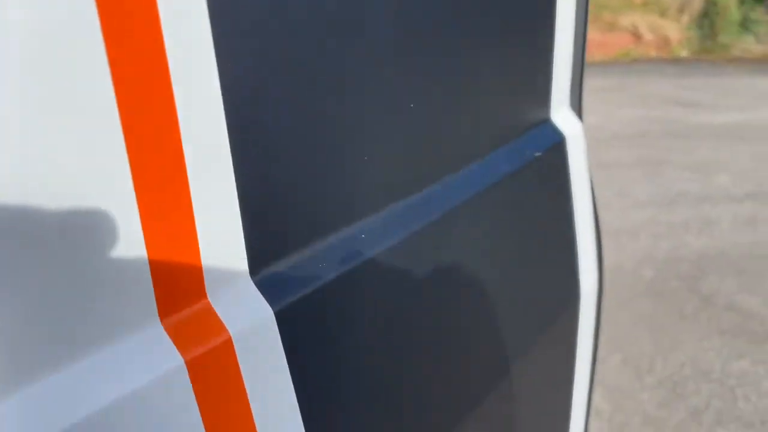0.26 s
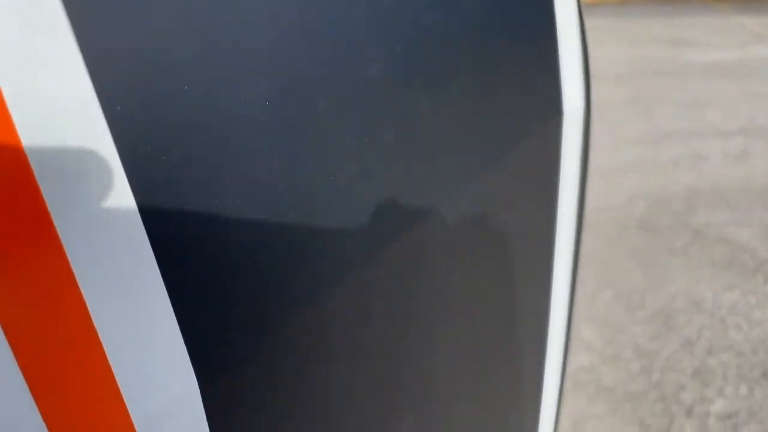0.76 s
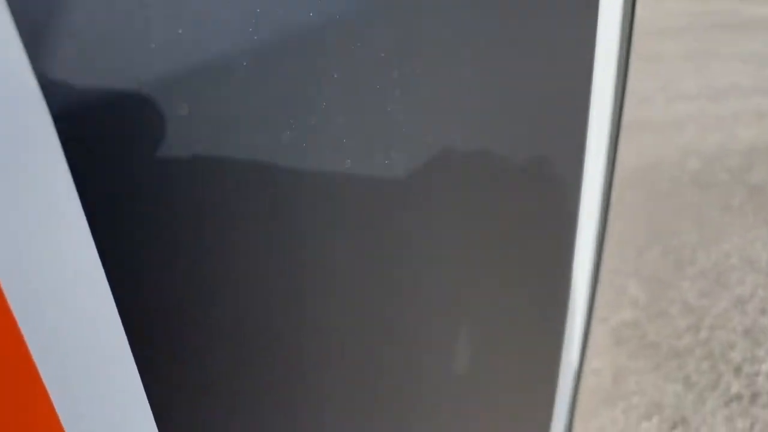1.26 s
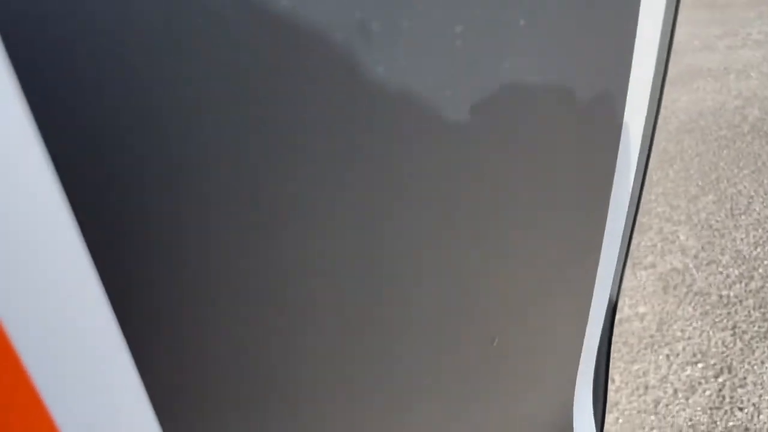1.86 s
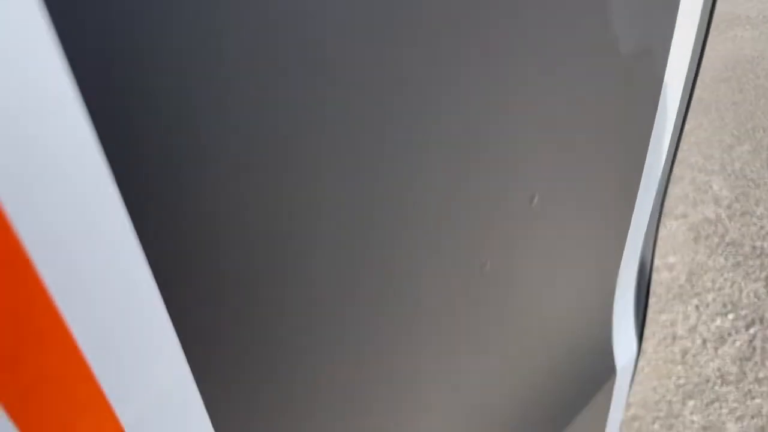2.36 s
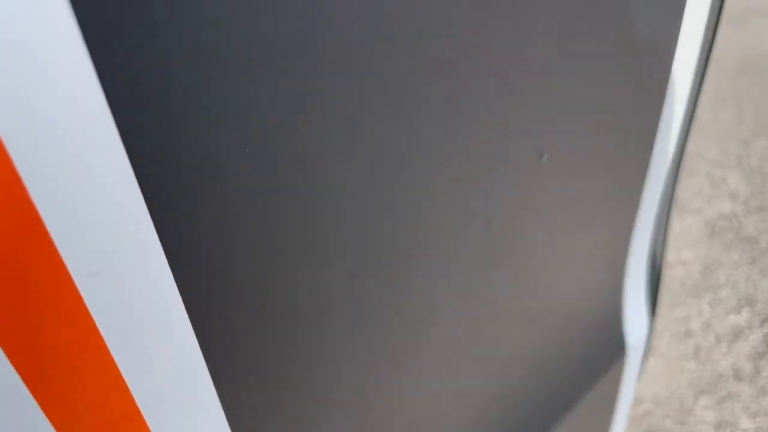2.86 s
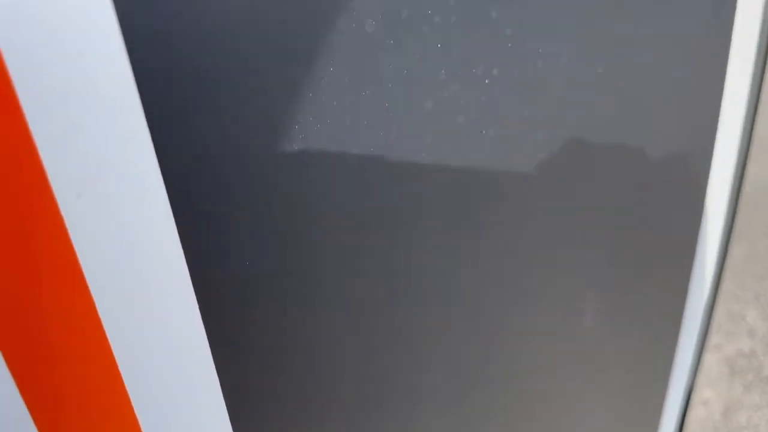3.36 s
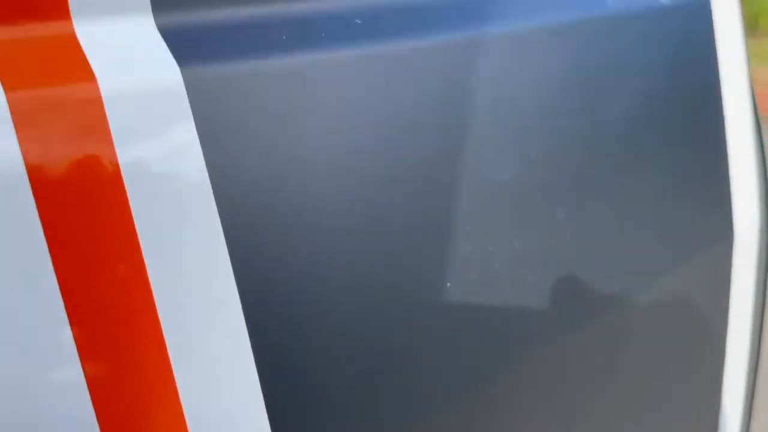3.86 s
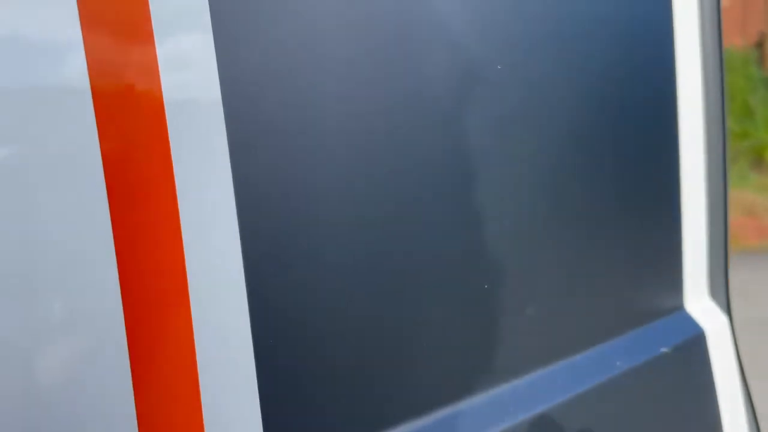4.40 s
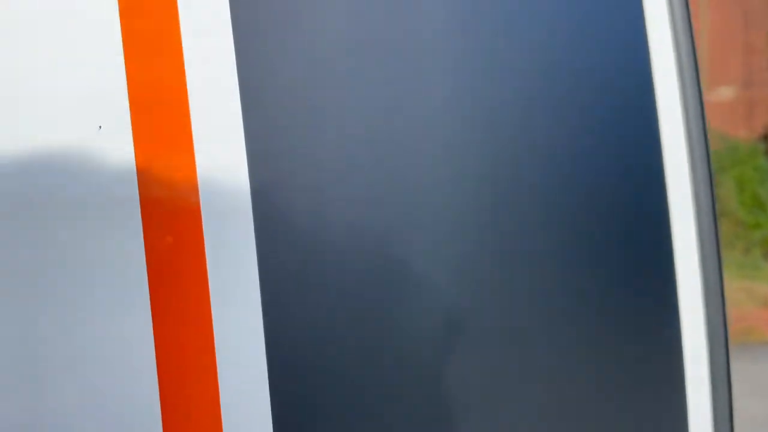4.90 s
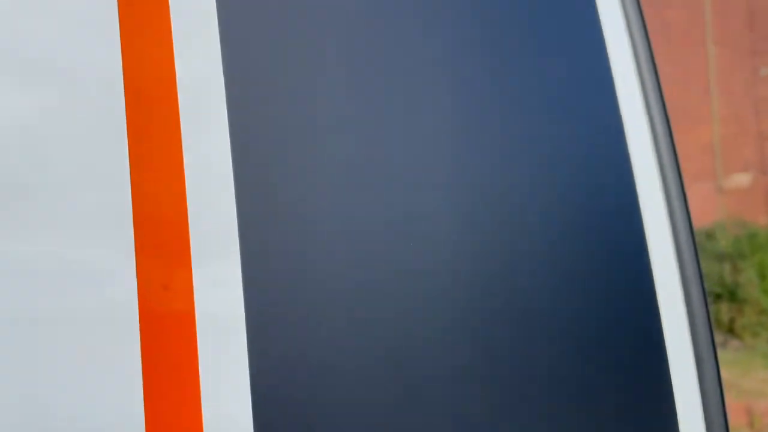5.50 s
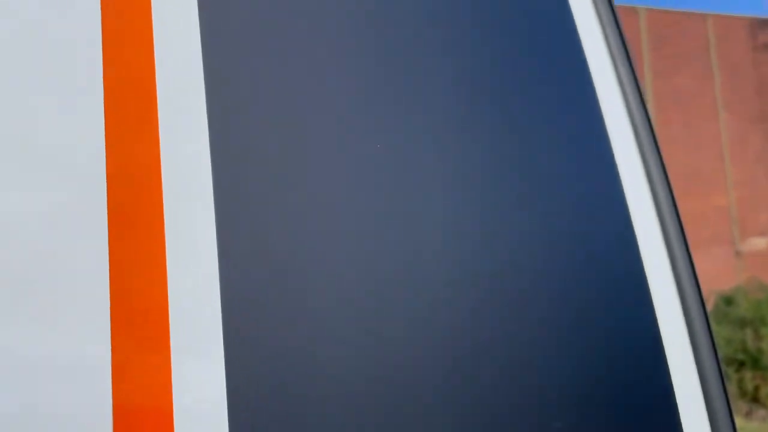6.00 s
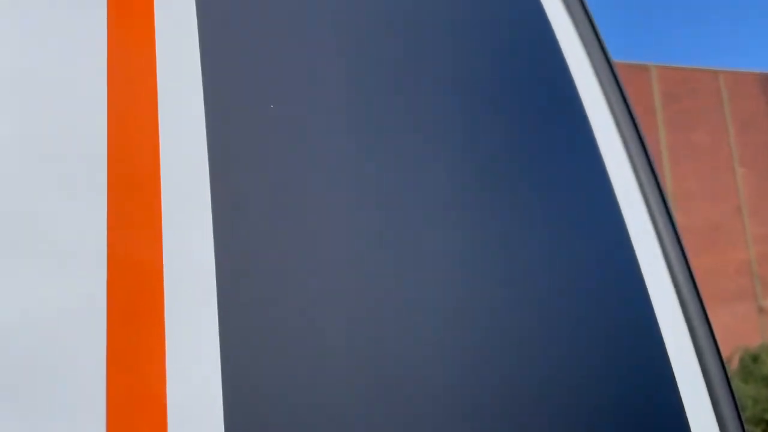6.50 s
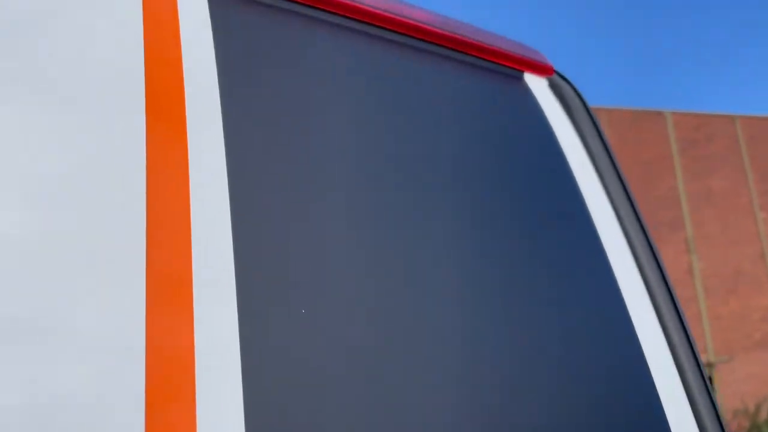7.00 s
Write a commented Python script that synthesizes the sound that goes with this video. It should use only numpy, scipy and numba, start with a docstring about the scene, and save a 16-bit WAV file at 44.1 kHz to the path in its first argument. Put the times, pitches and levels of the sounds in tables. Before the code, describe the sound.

Stereo handheld phone sound beside a van on an open tarmac lot, with a steady soft bed of wind rumble and far traffic. At 0 s a struck metal part is already ringing, bright and rattly, fading within about half a second. From 0.15 to 0.5 s a latch makes a dense flurry of small, hard clicks. Low, short thuds of steps and handling continue irregularly, firmer at 0.5 and 1.4 s. At 2.6 s a heavy slam booms through large panels, with quick weaker rebounds and a dull tail. Faint, blurred birds chirp intermittently until 4.9 s. Tiny dry ticks appear at 3.6, 4.5, 5.6, 6.4 and 6.9 s. A faint vehicle passes around 4.7 s; a stronger tyre roar swells around 6.3 s. From 6.9 to 7.2 s strong, deep knocks cluster as the rumble rises, then everything stops.

```python
"""An open tarmac lot beside a van, heard through a phone held in the hand, with a left and a right channel.
At the start a struck metal part is already ringing out, as decaying tones with rattling noise, and a latch clicks
as short high rings. Sinking low tones make steps and knocks throughout; at 2.6 s ringing panels make a heavy slam.
Tiny ticks follow from 3.6 s, vehicles of shaped noise swell past from 4.7 s, and strong knocks come near the end.
Noise makes the rumble of wind and far traffic all along; birds, as blurred whistles, chirp until 4.9 s."""
import sys
import numpy as np
from scipy import signal
from scipy.fft import rfft, irfft, next_fast_len
from scipy.io import wavfile
from scipy.ndimage import uniform_filter1d
from numba import njit

SR = 44100
rng = np.random.default_rng(int(sys.argv[2]) if len(sys.argv) > 2 else 0)


def int16_out(signal):
    """Quantize to a 16-bit WAV file."""
    q = np.round(np.clip(np.atleast_2d(signal).T, -1, 1) * 32767)
    wavfile.write(sys.argv[1], SR, q.astype(np.int16))


N = 319725
MARGIN = 4096  # samples made beyond both ends, so that filters have settled
LONG = next_fast_len(N + 2 * MARGIN)
LEFT_RIGHT = np.array([[1], [-1]])  # added to the left channel, taken from the right


def undb(db):
    """Turn decibels into a factor."""
    return 10 ** (np.asarray(db, float) / 20)


def curve(table):
    """Draw straight lines through (time, value) points."""
    table = np.array(table)
    return np.interp(np.arange(N) / SR, table[:, 0], table[:, 1])


def unit(x):
    """Scale a sound to an average (RMS) level of 1."""
    return x / np.sqrt(np.mean(x ** 2))


def by_pitch(hz, values):
    """Read a value for every frequency of a long sound, between points spaced by pitch."""
    f = np.maximum(np.arange(LONG // 2 + 1) * SR / LONG, 1)
    return np.interp(np.log(f), np.log(hz), values)


def colour(x, table):
    """Shape a sound by (Hz, dB) points."""
    hz, db = np.transpose(table)
    return irfft(rfft(x) * undb(by_pitch(hz, db)), LONG)


@njit
def svf(x, hz, width):
    """State-variable band-pass filter, gain 1 at the centre."""
    y, b, l = np.empty(len(x)), 0., 0.
    g, k = np.tan(np.pi * hz / SR), width / hz
    for i in range(len(x)):
        v = (b + g * (x[i] - l)) / (1 + g * (g + k))
        b, l, y[i] = 2 * v - b, l + 2 * g * v, k * v
    return y


def narrow(x, hz, width):
    """Keep a band of a sound, filtered twice for steeper sides."""
    hz, width = float(hz), float(width)
    return svf(svf(x, hz, width), hz, width)


def walk(rate):
    """Wander between random levels, `rate` new ones per second, smoothed twice; spread 1."""
    k = int(SR / rate)
    steps = np.repeat(rng.standard_normal(LONG // k + 1), k)
    return unit(uniform_filter1d(uniform_filter1d(steps, k), k)[:LONG])


def restless(table, shared_db, own_db):
    """Noise of a given colour whose octaves swell together and flicker alone, at RMS level 1."""
    shared = shared_db * walk(6.8)
    total = np.zeros(LONG)
    for hz in 30 * 2. ** np.arange(10):
        band = svf(rng.standard_normal(LONG), hz, 0.89 * hz)
        total += band * undb(shared + own_db * walk(15))
    return unit(colour(total, table))


# How alike the two channels are, from -1 (opposed) to 1 (same); values beyond are clipped.
# Columns: pitch_hz, far_sound (-1 to 1), vehicle (-1 to 1), metal (-1 to 1)
CHANNEL_LIKENESS = [(59, 0.63, 0.85, .7), (239, 0.92, 0.72, .7), (560, -0.17, -0.36, 0.85),
                    (1070, -0.61, 1, 0.87), (1430, -0.28, 0.45, 0.45), (2390, 0.76, 0.78, 0.72),
                    (3920, 0.19, 1, -0.17), (4930, 0.7, 1, -0.082), (5820, 0.13, 0.2, -0.78),
                    (7220, -1.015, -.9, -0.86), (8720, -0.54, -0.42, -0.028), (11700, 1, -0.44, 0.16)]
# How much more the left channel hears than the right. Columns: pitch_hz, difference_db
LEFT_OVER_RIGHT = [(60, 0), (125, 0.5), (250, 2), (490, 4.5), (750, 1), (2000, 0), (4000, 3), (8000, 0)]


def ports(x, other, column, turn=0.):
    """The right channel shares part of the left one's sound, by frequency; the rest is its own."""
    table = np.array(CHANNEL_LIKENESS)
    alike = np.clip(by_pitch(table[:, 0], table[:, column]), -1, 1)
    f = np.maximum(np.arange(LONG // 2 + 1) * SR / LONG, 1)
    turned = np.exp(1j * turn * (alike > 0) * (f > 400))
    shared = alike * rfft(x) * turned
    own = np.sqrt(1 - alike ** 2) * rfft(other)  # keeps the total power
    right = irfft(shared + own, LONG)
    half = np.array(LEFT_OVER_RIGHT) * [1, .5]
    return np.array([colour(x, half), colour(right, half * [1, -1])])[:, MARGIN:MARGIN + N]


def add(out, s, sound):
    """Mix a sound in, starting at s seconds."""
    i = int(s * SR)
    out[..., i:i + sound.shape[-1]] += sound[..., :N - i]


def fade(t, t60):
    """Die away by 60 dB in t60 seconds."""
    return np.exp(-np.log(1000) * t / t60)


def rise(t, build_s):
    """Build up smoothly: 63 percent after build_s seconds."""
    return 1 - np.exp(-t / build_s)


def ring(modes, t, spread, tilt_db=0.):
    """Strike modes, each a little detuned and uneven; a positive tilt (dB per octave) favours the high ones."""
    chance = rng.standard_normal((len(modes), 2))
    middle_hz = modes[len(modes) // 2][0]
    total = 0.
    for (hz, db, t60), (uneven, detune) in zip(modes, chance):
        level = undb(db + 1.2 * uneven + tilt_db * np.log2(hz / middle_hz))
        total = total + level * fade(t, t60) * np.sin(2 * np.pi * hz * (1 + spread * detune) * t)
    return total


def echo(sound, tail):
    """Blend a sound with a random tail, each channel with its own."""
    return signal.fftconvolve(sound, tail / np.linalg.norm(tail[0]), axes=1)[:, :N]


# Steps and knocks; the base pitch is scaled by the glide below.
# Columns: start_s, level_db (before the push shapes it), base_pitch_hz, t60_s (time to fade 60 dB)
STEPS_AND_KNOCKS = [(0.228, -24.5, 63.6, 0.14), (0.258, -29, 73.3, 0.37), (0.44, -29, 101, .082),
                    (0.521, -12.5, 72, 0.047), (0.581, -22.5, 84, .12), (0.682, -26, 63.5, 0.087),
                    (0.717, -26, 54, 0.22), (0.886, -23, 65, 0.17), (1.049, -31, 64, 0.29),
                    (1.178, -25.5, 57, 0.12), (1.435, -14, 84.3, 0.078), (2.033, -30, 54, 0.17),
                    (2.334, -28.5, 91.5, 0.15), (2.726, -40, 55, 0.087), (2.759, -25, 51.6, 0.15),
                    (2.839, -26, 73, 0.06), (2.89, -31, 78.5, 0.082), (3.082, -29.5, 72, 0.33),
                    (3.121, -27, 66.5, 0.18), (4, -28.5, 62, 0.16), (4.405, -29, 54, 0.22),
                    (4.745, -24.5, 85, 0.13), (5.231, -29.5, 64, 0.11), (5.693, -27.5, 58, 0.17),
                    (5.939, -29, 68, 0.15), (6.418, -29.5, 66.3, 0.31), (6.78, -28, 71.3, 0.13),
                    (6.89, -12, 70.6, 0.11), (7.006, -16.5, 133, 0.078), (7.033, -12, 82, 0.063),
                    (7.067, -17.5, 64, 0.1), (7.116, -22.5, 74.3, 0.28), (7.156, -21, 124, 0.085),
                    (7.166, -12.5, 77, 0.12)]
FIRST_TOUCH, SETTLED = 2.46, 0.789  # first and last pitch, times the base pitch
SINK_S, PUSH_S = 0.0081, 0.0071  # time scales of the pitch sinking and of the push building
SMALL_THUDS = 14  # faint ones at random moments


def thuds():
    """Each thud is a soft push through ground and hand: a low tone that builds, sinks in pitch and fades."""
    out, t = np.zeros((2, N)), np.arange(int(.3 * SR)) / SR
    small = []
    for when, louder, higher in rng.random((SMALL_THUDS, 3)) - [0, .5, .5]:
        small.append((N / SR * when, -33 + 6 * louder, 62.9 * (1 + 0.24 * higher), 0.23))
    for s, db, hz, t60 in list(STEPS_AND_KNOCKS) + small:
        glide_hz = hz * (SETTLED + (FIRST_TOUCH - SETTLED) * np.exp(-t / SINK_S))
        tone = np.sin(2 * np.pi * np.cumsum(glide_hz) / SR)
        pan_db = 3 * rng.standard_normal()
        add(out, s, undb(db + LEFT_RIGHT * pan_db / 2) * rise(t, PUSH_S) * fade(t, t60) * tone)
    return out


# Blows of the heavy slam. Columns: start_s, level_db (of the panels' sum), hardness_db (per octave)
SLAM_BLOWS = [(2.589, -20.5, 0), (2.605, -32, -6.5), (2.617, -40, 14), (2.634, -35.5, 5.5),
              (2.653, -43.5, -2), (2.673, -41.5, 16)]
# Panels that each blow rings. Columns: pitch_hz, level_db (within the blow), t60_s
SLAM_PANELS = [(62, -3.5, 0.15), (105.5, -3, 0.17), (177, 0.5, 0.11), (209, -7.5, 0.31),
               (272.6, 1.5, 0.098), (308, -5.5, 0.12), (392, -8.5, 0.14), (501, -14, 0.13),
               (656, -34, 0.11)]
# Tail over the lot, as bands of noise. Columns: pitch_hz, level_db (before swelling and fading), t60_s
LOT_TAIL = [(61.4, -28, 0.49), (116.6, -29, 0.81), (236, -38.5, 1), (480, -60, 0.31), (1030, -72, .5),
            (2460, -63, 1), (4500, -70.5, 0.49)]


def slam():
    """A heavy blow and weaker rebounds ring large panels; bands of fading noise form a dull tail."""
    out, t = np.zeros((2, N)), np.arange(SR) / SR
    for s, db, hard_db in SLAM_BLOWS:
        mid = ring(SLAM_PANELS, t, 0.019, hard_db)
        side = 0.46 * ring(SLAM_PANELS, t, 0.019, hard_db)
        add(out, s, undb(db) * rise(t, 0.0031) * (mid + side * LEFT_RIGHT))
    for hz, db, t60 in LOT_TAIL:
        mid, side = (unit(narrow(rng.standard_normal(SR), hz, 0.63 * hz)) for _ in range(2))
        swell = rise(t, 0.0081) * fade(t, t60)
        add(out, SLAM_BLOWS[0][0], undb(db) * swell * (mid + 0.28 * side * LEFT_RIGHT))
    return out


# Loose pieces rattling on the metal part, as bands of noise.
# Columns: pitch_hz, width_hz, level_db (before shaking and channel balance), loudest_s, t60_s (after that)
LOOSE_PIECES = [(1040, 710, -56, .02, 1), (1470, 360, -51.5, 0.045, 0.88), (1635, 250, -56.5, 0.18, 0.9),
                (1834, 150, -49.5, 0.094, .35), (2036, 200, -42.5, 0.03, 0.26),
                (2240, 160, -47, 0.08, 0.27), (2490, 210, -50, 0.062, 0.28), (3110, 240, -41, 0.028, 0.3),
                (3295, 170, -50, 0.078, 0.36), (2720, 450, -56, .03, 0.55), (3780, 150, -58, 0.074, 0.32),
                (4300, 250, -55, .02, .3), (4650, 150, -56.5, 0.045, .4), (4990, 200, -58.5, 0.065, 0.35),
                (5570, 630, -61, .03, 0.45), (4500, 1900, -58, 0.043, 0.49),
                (6500, 2000, -47.5, 0.05, 0.28), (8500, 4700, -68.5, .02, 0.65),
                (10600, 2300, -66, .02, 0.31)]
RATTLE_RISE_S = 0.95  # time to gain 60 dB


def rattle(t):
    """Loose pieces hiss in the part's resonances; each band rises to its loudest moment, then fades."""
    total = np.zeros(LONG)
    for hz, width, db, top_s, t60 in LOOSE_PIECES:
        before = fade(np.maximum(top_s - t, 0), RATTLE_RISE_S)
        after = fade(np.maximum(t - top_s, 0), t60)
        total += undb(db) * before * after * unit(narrow(rng.standard_normal(LONG), hz, width))
    return total


# Tones of the struck metal part. Columns: pitch_hz, level_db (relative), t60_s
METAL_TONES = [(1995, -0.5, 0.25), (2140, -16.5, .3), (2370, -6, 0.3), (2950, -18, .3), (3080, -9.5, 0.25),
               (3250, -13, 0.4), (4640, -26, 0.4), (6020, -18.5, 0.48), (7881, -38, 0.4)]
METAL_DB = -37.5  # shifts all the tones
METAL_TURN = -1.67  # radians: phase turn of the right channel above 400 Hz, where the channels agree


def metal():
    """The dying ring of a struck part: fading tones, with the shaky rattle of loose pieces."""
    t = (np.arange(LONG) - MARGIN) / SR
    shake = undb(2.5 * walk(120))
    left, other = (undb(METAL_DB) * ring(METAL_TONES, t, 0.002) + shake * rattle(t) for _ in range(2))
    return ports(left, other, column=3, turn=METAL_TURN) * undb([[-2], [2]])


# Latch clicks. Columns: start_s, level_db (of the whole click, before panning),
# body_db (relative), edge_db (relative), shell_pitch_hz
LATCH_CLICKS = [(0.1554, -47, -12, -2, 1120), (0.2023, -52, -18, -15, 1920),
                (0.2155, -33.5, -12, -13, 1910), (0.2518, -50, -9, -5, 1230), (0.278, -58, -20, -20, 1520),
                (0.300, -60, -20, 10, 1700), (0.3115, -39.5, 7.5, -2, 1830), (0.317, -41, 0, -7, 1920),
                (0.3245, -37, 0.5, -4, 1980), (0.332, -40, -0.5, 4.5, 1880), (0.3361, -49, 6, 7.5, 1270),
                (0.345, -48, -3, -8, 1910), (0.356, -56, -16, -14, 1900), (0.3689, -44.5, -12, 3, 1820),
                (0.375, -51, -3, -12, 1300), (0.3885, -49, -12, -14, 1920), (0.407, -44, -16, 2, 1940),
                (0.414, -42, -5.5, 1.5, 1720), (0.420, -53, -14, -2, 1880), (0.425, -51.5, -7, 3, 2010),
                (0.4626, -39.5, 0.5, -4, 1230), (0.5078, -50, -8, 1, 1860)]
# Low, middle and high rings of a click; the shell's pitches are scaled to each click.
# Columns of all three: pitch_hz, level_db (relative), t60_s
CLICK_BODY = [(493, 7, 0.015), (570, 10, 0.023), (740, 11.5, 0.015), (873, 7.5, 0.02)]
CLICK_SHELL = [(1250, 8.3, 0.0082), (1920, 8.3, 0.013), (2390, 2.1, 0.01), (2950, 1, 0.0084)]
CLICK_EDGE = [(5000, 7.5, 0.005), (5560, 0, 0.0057), (9200, -25, .004), (10170, -11, 0.0051)]


def clicks():
    """Short hard contacts ring body, shell and edge with grit; the highs reach the channels a moment apart."""
    out, t = np.zeros((2, N)), np.arange(int(0.044 * SR)) / SR
    contact = rise(t, 0.00027) ** 2  # a contact takes a moment to build
    for s, db, body_db, edge_db, shell_hz in LATCH_CLICKS:
        pan_db = 2 * rng.standard_normal()
        grit = rng.standard_normal((2, len(t))) * fade(t, 0.023)
        shell = ring(CLICK_SHELL, t * shell_hz / CLICK_SHELL[1][0], 0.049)
        shell = shell + undb(-3.0) * svf(grit[0], float(shell_hz), 610.0)
        edge = ring(CLICK_EDGE, t, 0.04) + undb(4.0) * narrow(grit[1], 3300, 3000)
        top = contact * (shell + undb(edge_db) * edge)
        body = rise(t, 0.00072) ** 2 * undb(body_db) * ring(CLICK_BODY, t, 0.085)
        apart_s = .00012 * rng.uniform(-1, 1)
        for port, sign in enumerate((1, -1)):
            gain = undb(db + sign * pan_db / 2)
            add(out[port], s, gain * body)
            add(out[port], s + max(sign * apart_s, 0), gain * top)
    # loose bits chatter on after each click: sparse random copies of it
    t = np.arange(int(.15 * SR)) / SR
    bits = rng.standard_normal((2, len(t))) * (rng.random((2, len(t))) < .05) * fade(t, 0.15)
    return out + undb(-9) * echo(out, bits)


# Lone small ticks; levels are before their build-up and fade.
# Columns: start_s, snap_db, ring_db, ring_hz, ring_t60_s, high_db, high_hz, high_t60_s
LONE_TICKS = [(3.6367, -58, -39.5, 1760, 0.011, -60, 9500, .008),
              (4.45, -53, -50, 5800, 0.0049, -53, 7800, 0.0041),
              (5.634, -69, -48.5, 2420, 0.028, -62, 2800, .008),
              (6.404, -60, -44, 2300, 0.015, -64, 2900, .008),
              (6.9326, -61, -39, 1434, 0.024, -45, 1150, 0.016)]


def ticks():
    """Tiny dry contacts, equal in both channels: a snap of noise with two short rings."""
    out, t = np.zeros((2, N)), np.arange(int(.03 * SR)) / SR
    for s, snap_db, db, hz, t60, high_db, high_hz, high_t60 in LONE_TICKS:
        rings = ring([(hz, db, t60), (high_hz, high_db, high_t60)], t, .01)
        snap = undb(snap_db) * svf(rng.standard_normal(len(t)), 5000., 9000.) * fade(t, 0.0027)
        add(out, s, rise(t, 0.000091) * rings + snap)
    return out


# Vehicles going by. Columns: middle_s, level_db (there, before wavering and bounce), before_s and after_s
# (times to drop about 3 dB), bounce_ms (typical delay off the van's side), bounce_db, treble_db (extra)
VEHICLES = [(4.75, -62.5, 0.54, 1, 1.05, -12, -3.5), (6.28, -49.5, 0.41, 0.42, 1.52, -10, -14.5)]
PASS_FALL_DB = 9.5  # level lost each time 1 + (time from the middle / half time) ** PASS_EDGE grows tenfold
PASS_EDGE = 4  # how sharply a vehicle comes out from cover and goes behind it again
BOUNCE_GROWS, BOUNCE_WAVER = 0.01, 0.03  # shares of the delay: growth per second near the middle; wander


def passing(tyres):
    """Tyre noise swells and sinks; the van's side sends back a delayed, inverted copy."""
    out, now = np.zeros((2, N)), np.arange(N)
    for k, (s, db, before_s, after_s, bounce_ms, bounce_db, treble_db) in enumerate(VEHICLES):
        from_middle_s = now / SR - s
        car = np.roll(tyres, k * SR, axis=1)  # another stretch of noise for each vehicle
        car = car + undb(treble_db) * 10 * np.diff(car, prepend=0)
        car = car * undb(.7 * walk(11)[:N])
        stretch = 1 + BOUNCE_GROWS * np.tanh(from_middle_s) + BOUNCE_WAVER * walk(2.7)[:N]
        earlier = now - bounce_ms * stretch * SR / 1000
        car = car - undb(bounce_db) * np.array([np.interp(earlier, now, c) for c in car])
        near_s = np.where(from_middle_s < 0, before_s, after_s)
        fall_db = PASS_FALL_DB * np.log10(1 + np.abs(from_middle_s / near_s) ** PASS_EDGE)
        out += undb(db - fall_db) * car
    return out


# Bands of the vehicles' roar. Columns: middle_s, half_length_s, pitch_hz, width_hz, level_db (at the middle)
ROAR_BANDS = [(4.58, .2, 1364, 220, -66), (4.653, .12, 2820, 500, -71), (4.94, 0.11, 1220, 230, -67),
              (5.22, 0.15, 960, 280, -69), (5.88, 0.11, 955, 120, -56), (6.12, 0.11, 1065, 180, -52.5),
              (6.146, 0.22, 410, 120, -50.5), (6.39, 0.19, 720, 160, -49.5), (6.746, 0.15, 990, 190, -55),
              (6.3, 0.36, 2274, 240, -64), (6.3, 0.23, 1620, 200, -61.5), (6.03, 0.17, 2870, 300, -70.5)]


def roar(tyres):
    """Bands picked out of the tyre noise swell and fade as the vehicles go by."""
    out = np.zeros((2, N))
    for s, half_s, hz, width, db in ROAR_BANDS:
        band = unit(np.array([narrow(c, hz, width) for c in tyres]))
        out += undb(db) * band * np.exp(-.5 * ((np.arange(N) / SR - s) / half_s) ** 2)
    return out


# Tone colour of the tyre noise. Columns: pitch_hz, density_db (per Hz, relative)
TYRE_COLOUR = [(88, -34), (200, -12.5), (400, -1.5), (700, -6), (1000, -3.5), (1600, -13), (2260, -22.5),
               (3100, -28.5), (4500, -37.5), (6500, -55.5), (8000, -76)]


def vehicles():
    """One restless tyre noise feeds both the vehicles' passing and their roar."""
    tyres = ports(*(restless(TYRE_COLOUR, .6, 1.2) for _ in range(2)), column=2)
    return passing(tyres) + roar(tyres)


# Far birds; level_db is before blur and echo.
# Columns: start_s, end_s, first_hz, last_hz, blur_hz, level_db
FAR_BIRDS = [(0.48, 0.674, 6250, 5870, 1190, -68), (2.157, 2.42, 6400, 5830, 1180, -73.5),
             (3.1, 3.37, 5350, 5250, 500, -74), (1.68, 1.725, 3680, 3620, 100, -74),
             (1.71, 1.9, 3480, 3420, 250, -74), (1.78, 2.11, 3700, 3780, 600, -71),
             (3.13, 3.45, 4100, 3950, 400, -73), (3.42, 3.75, 3900, 3750, 400, -75),
             (4.62, 4.82, 4750, 4700, 700, -76), (2.36, 2.52, 5550, 5450, 300, -76),
             (4.112, 4.15, 8100, 7850, 60, -80), (4.188, 4.22, 6620, 5750, 60, -70),
             (4.218, 4.275, 5600, 4850, 70, -72), (4.115, 4.165, 5500, 4800, 160, -74),
             (4.15, 4.41, 4950, 4800, 250, -72), (4.345, 4.39, 4900, 4250, 150, -74),
             (4.38, 4.58, 4520, 4450, 300, -73)]
CLEAR_HZ = 80  # a whistle blurred less than this is steady


def birds():
    """Gliding whistles, blurred by distance into trills; walls send them back as a fading tail."""
    out = np.zeros((2, N))
    for start, end, first_hz, last_hz, blur_hz, db in FAR_BIRDS:
        n = int((end - start) * SR)
        tone = np.sin(2 * np.pi * np.cumsum(np.linspace(first_hz, last_hz, n)) / SR)
        blur = uniform_filter1d(rng.standard_normal((2, SR)), int(SR / blur_hz))[:, :n]
        blur = blur * np.sqrt(SR / blur_hz)  # back to spread 1
        steady = min(CLEAR_HZ / blur_hz, 1)
        trill = steady + np.sqrt(1 - steady ** 2) * blur
        add(out, start, undb(db) * np.hanning(n) ** 0.66 * tone * trill)
    t = np.arange(int(.4 * SR)) / SR
    walls = rng.standard_normal((2, len(t))) * fade(t, 0.3)
    return out + undb(1) * echo(out, walls)


# Loudness of far traffic. Columns: time_s, level_db
TRAFFIC_LEVEL = [(0, -49.5), (1.95, -49.5), (2.75, -49.5), (3.2, -50), (3.7, -49), (7.25, -47.5)]
# Its tone colour. Columns: pitch_hz, density_db (per Hz, relative)
TRAFFIC_TONE = [(70, -20), (120, -5.5), (200, -3.5), (440, -17), (820, -15.5), (1370, -21), (2000, -30.5),
                (3000, -34.5), (4200, -42), (6300, -45.5), (7400, -49.5), (9000, -53.5), (11500, -61.5),
                (14000, -79)]


def traffic():
    """Far traffic is steady noise whose bands swell and flicker."""
    left, other = (restless(TRAFFIC_TONE, 1.0, 1.0) for _ in range(2))
    return undb(curve(TRAFFIC_LEVEL)) * ports(left, other, column=1)


# Loudness of the low rumble. Columns: time_s, level_db
RUMBLE_LEVEL = [(0.0, -51), (0.35, -45), (0.7, -44.5), (1.47, -46), (2.0, -46), (2.77, -41.5), (3.8, -45),
                (4.05, -50.5), (4.83, -44.5), (5.7, -45.5), (6.7, -44.5), (7.25, -31)]
# Its tone colour. Columns: pitch_hz, density_db (per Hz, relative)
RUMBLE_TONE = [(12, -55.5), (20, -31), (24, -23), (35, -3.5), (59, 5.5), (129, -11), (323, -21), (400, -24),
               (520, -28), (880, -120)]


def rumble():
    """Wind and far engines are deep noise that rises and falls."""
    left, other = (restless(RUMBLE_TONE, 0.24, 1.0) for _ in range(2))
    return undb(curve(RUMBLE_LEVEL)) * ports(left, other, column=1)


def scene():
    """Everything together."""
    near = thuds() + slam() + metal() + clicks() + ticks()
    return near + vehicles() + birds() + traffic() + rumble()


def record(dry):
    """The phone drops the deepest bass and cuts the top; the last instant fades."""
    dry = signal.sosfilt(signal.butter(2, 30, "high", fs=SR, output="sos"), dry)
    dry = dry * np.minimum(np.arange(N)[::-1] / (.004 * SR), 1)
    return signal.sosfilt(signal.ellip(8, .2, 70, 15700, fs=SR, output="sos"), dry)


dry = scene()
out = record(dry)
int16_out(out)
```